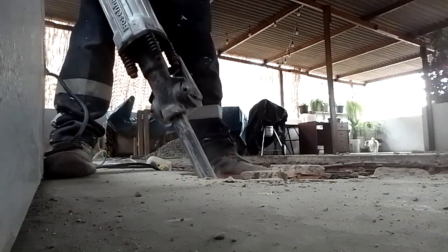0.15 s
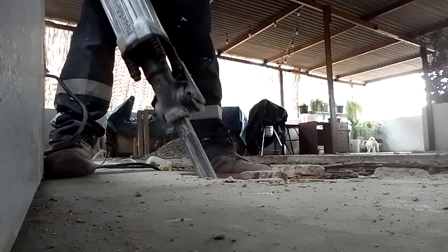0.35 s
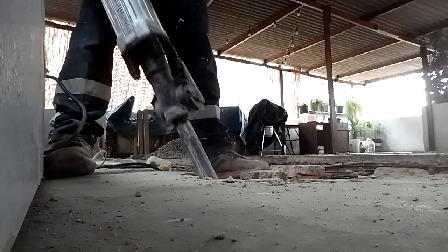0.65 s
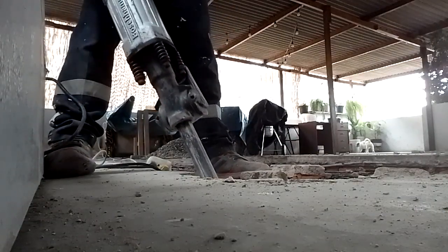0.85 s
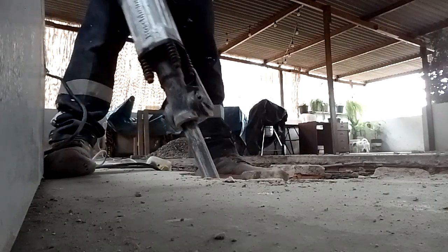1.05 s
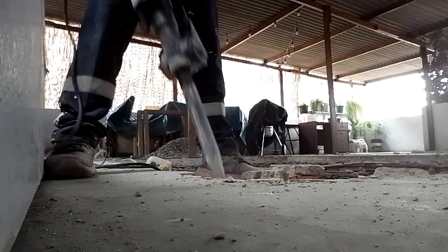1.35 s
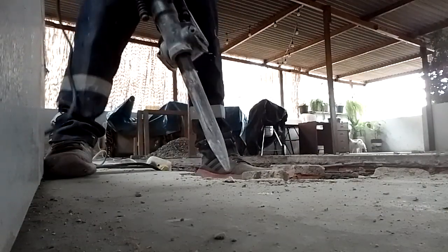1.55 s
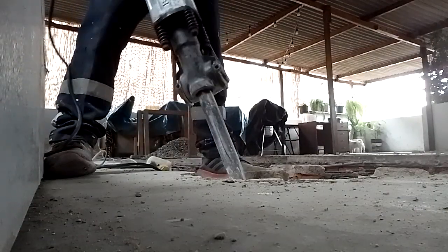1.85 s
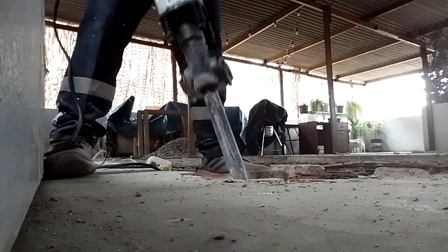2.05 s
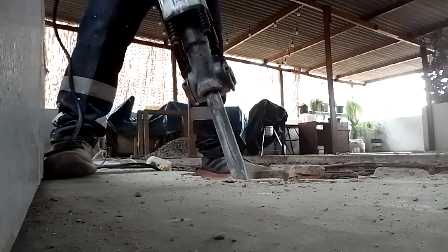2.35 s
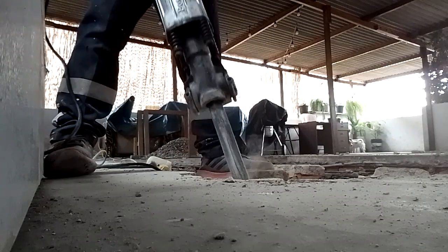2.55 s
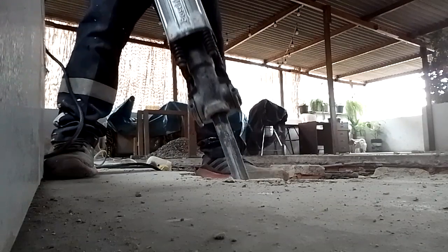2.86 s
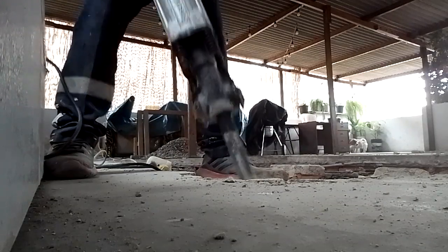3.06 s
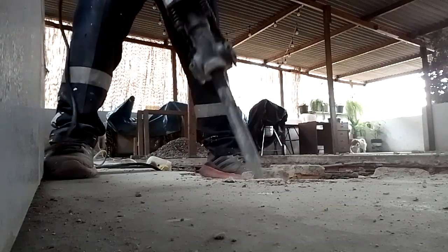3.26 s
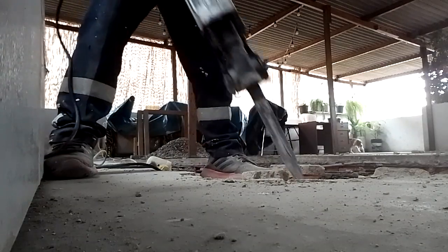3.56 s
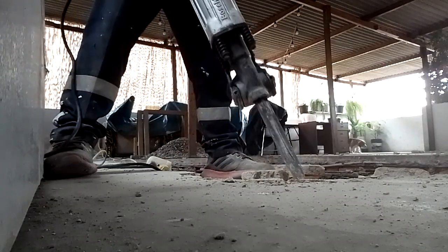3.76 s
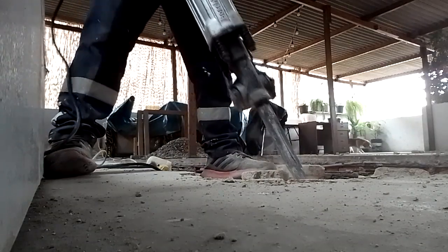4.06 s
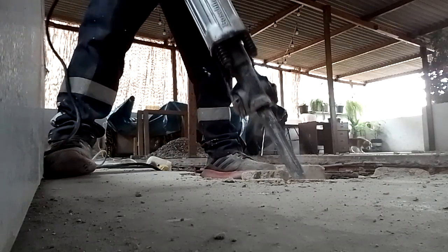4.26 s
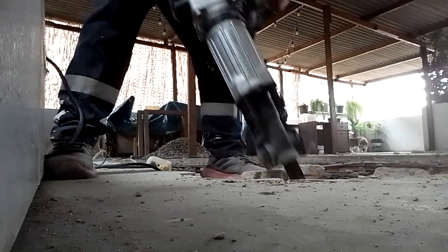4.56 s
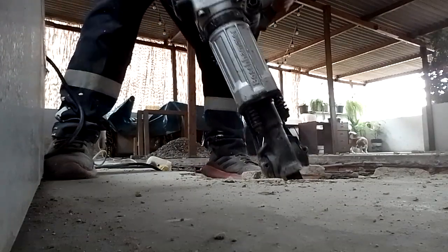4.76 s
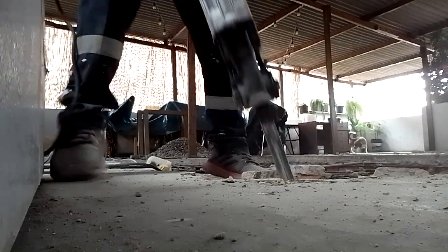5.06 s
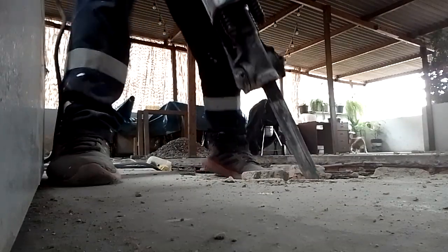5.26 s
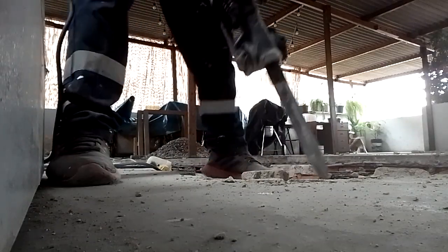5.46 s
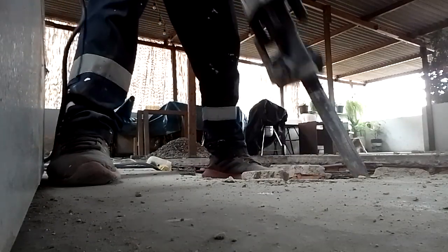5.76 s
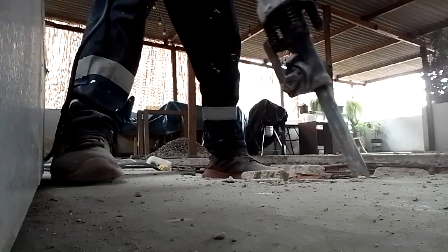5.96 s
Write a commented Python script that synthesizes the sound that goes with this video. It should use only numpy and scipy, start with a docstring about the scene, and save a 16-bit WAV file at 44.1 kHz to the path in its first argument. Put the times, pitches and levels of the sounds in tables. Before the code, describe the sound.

Rapid metallic hammering in uneven spells, under an open roofed area. Each spell is a dense machine-gun clatter of ringing steel, gritty cracks and low thumps, with brief squeaks. Between spells the tool runs free, with rushing fan air, coarse rattle, growling gear case and a rising, piercing whine. The sound is mono, very near, slightly overloaded, with only a slight reverberation.

```python
"""An electric demolition hammer breaks a concrete floor under a sheet roof, close to a mono microphone.
It starts pressed down: its striker hits the chisel some 25 times a second, steel rings, concrete cracks and thuds.
After 1.2 s it is lifted: it rattles nearly idle, the gear case growls and the motor whines upward.
Two more spells follow, from 2 and 3.8 s, each ending in a lift; a third begins at 6 s.
Modes make the ringing, shaped noise most of the rest; loud peaks overload the microphone stage."""
import sys
import numpy as np
from scipy import signal
from scipy.fft import rfft, irfft, next_fast_len
from scipy.io import wavfile
from scipy.ndimage import uniform_filter1d, minimum_filter1d, map_coordinates

SR = 44100
rng = np.random.default_rng(int(sys.argv[2]) if len(sys.argv) > 2 else 0)


def put_to_file(sound):
    """Save the sound as 16-bit audio at rate SR, in the file named by the first command-line argument."""
    columns = np.atleast_2d(sound).T  # one column per channel
    safe = np.clip(columns, -1, 1)
    whole_steps = np.round(safe * 32767)
    wavfile.write(sys.argv[1], SR, whole_steps.astype(np.int16))


N = 270333

# striker blows, levels relative: start_s, crack_db, lengthwise_ring_db, bending_ring_db,
# prying (0-1: how far the blow levers the chisel sideways)
BLOWS = [(0.001, -13, -8, -10, 0.1), (0.044, -9.0, -10, -17, 0.1), (0.092, -12.0, -10, -19, 0.4),
         (0.132, -9, -2, -5, 0.1), (0.189, -7, -14, -10, 0.54), (0.226, -17, -11.5, -23, 0.6),
         (0.267, -10, -1, -1, 0.43), (0.317, -1, -8, -7, 0.36), (0.367, -11, -6, -6.5, 0.6),
         (0.402, -30, -9, -14, 0.4), (0.449, -9, -14, -8, 0.0), (0.494, -15.0, -11, -7.5, 0.16),
         (0.54, -13, -7, -2, 0.0), (0.583, -8, -14, -7, 0.35), (0.625, -14, -12, -11.5, 0.8),
         (0.667, -26, -17, -15, 0.8), (0.712, -12, -15, -8, 0.5), (0.751, -12, -12, -8, 0.6),
         (0.798, -15.0, -8, -3.5, 0.7), (0.84, -13, -9, -10, 0.5), (0.879, -32.0, -25, -21, 0.8),
         (0.929, -7, -9, -16, 0), (0.973, -12.0, -9, -6.5, 0.7), (1.019, -5.5, -18.5, -0.5, 0.88),
         (1.052, -27, -14, -11.5, 0.68), (1.097, -10, -30, -13, 0.77), (1.141, -8, -5, -1, 0.65),
         (1.185, -10, -12, -16, 0.9), (1.222, -23, -15, -16, 0.8), (1.334, -15, -32, -19, 1.0),
         (1.893, -12.5, -28, -27, 0.8), (1.963, -10, -29, -24, 0.8), (2.005, -10, -5, -11, 0.3),
         (2.044, -19, -12, -10, 0.1), (2.082, -18, -2.5, -8, 0), (2.118, -13, -6, -3.5, 0.18),
         (2.155, -8, -6, -5, 0.1), (2.19, -18, 1.5, 1, 0.03), (2.246, -7, -9, -10.5, 0.52),
         (2.31, -10.5, -27, -11, 0.3), (2.351, -18, -5, -2, 0.0), (2.394, -19, -3.5, -5, 0.1),
         (2.433, -8, -1.5, -4, 0), (2.473, -22, -3, -5, 0.1), (2.515, -13, -1.5, -11, 0.3),
         (2.553, -26, -1.5, -20, 0.2), (2.597, -10, -2, -0.5, 0.0), (2.64, -19, -5, -10, 0.4),
         (2.684, -13.0, -6, 0, 0.14), (2.736, -14, -7, -8, 0.47), (2.823, -14, -9, -4.5, 0.71),
         (2.866, -13, -6, -2.5, 0.03), (2.905, -25.0, -11, -12, 0.4), (2.955, -12, -4, 0, 0.0),
         (3.021, -17, -20, -26, 0.9), (3.091, -8.0, -7.5, -0.5, 0.57), (3.143, -17, -15, -1, 0.45),
         (3.189, -8, -14, -4.5, 0.6), (3.25, -18, -31, -18, 0.7), (3.744, -14, -38, -26, 0.7),
         (3.799, -12, -33, -35, 0.8), (3.842, -11, -18, -12, 0.2), (3.884, -9.5, -25, -16, 0.3),
         (3.92, -17, -26, -3, 0.02), (3.959, -18, -12, -5.5, 0.35), (3.99, -15.0, -20, -3, 0.12),
         (4.03, -14, -13, 0.5, 0.04), (4.071, -24, -9.5, -8, 0.16), (4.152, -12, -13, -15, 0.5),
         (4.19, -16, -10, -6, 0.2), (4.235, -6, -14, -10, 0.75), (4.279, -18, -11, -10, 0.3),
         (4.325, -22, -11, -26, 0.5), (4.369, -11.5, -11, -11, 0.62), (4.417, -12, -12, -9.5, 0.59),
         (4.46, -10, -22, -4.5, 0.28), (4.51, -14, -17, -10, 0.56), (4.559, -0.5, -21, -0.5, 0.86),
         (4.604, -4, -30, -7.5, 0.61), (4.65, -12, -35, -16, 0.6), (4.691, -9, -32, -27, 0.8),
         (4.741, -17.0, -34, -23, 0.9), (5.922, -11, -26, -15, 0.7), (5.978, -9, -34, -22, 0.7),
         (6.018, -17, -26, -9.5, 0.5), (6.059, -17, -26, -9, 0.37), (6.095, -23, -32, -10, 0.2)]
# what the tip sits on: start_s, hardness (0-1, crumbled to solid),
# twist (0-1, from the chisel's flat side to its edge)
SEAT = [(0, 0.55, 1), (.14, .7, 0.8), (.28, 0.72, 0.4), (.5, 0.1, 0.25), (.66, 0, 0.84), (.8, 0.04, 0),
        (1.06, 0.1, 0.07), (1.14, .9, 0.26), (1.25, .2, 0.5), (2.05, 0.64, .3), (2.74, 0.87, 0.64),
        (2.823, 0.2, 0), (2.87, 0.74, 0.1), (3.1, 0.91, 0.53), (3.25, 0.3, 0.6), (3.9, 0.74, 0.4),
        (4.46, 0.75, 0), (6.05, 0.8, 0.5)]
# the hammer is pressed on to the floor: start_s, end_s
PRESSED = [(0, 1.21), (1.97, 3.165), (3.84, 4.72), (6.0, 6.2)]
# spectrum of gears, bit and housing rattling: frequency_hz, relative density_db (per Hz)
RATTLE_SPECTRUM = [(30, -32), (110, -33), (200, -17.5), (310, -4.5), (470, 0.5), (730, -3.5), (1080, 1),
                   (1550, -1), (1700, -2), (2300, -1), (2650, -4), (5000, -5.5), (16000, -23)]
# spectrum of the rushing fan air: frequency_hz, relative density_db (per Hz)
AIR_SPECTRUM = [(1200, -21.5), (2600, -4), (3600, 2.5), (4450, -1), (4850, -1), (5400, 5.5), (6400, 2),
                (7000, -2), (7800, 3.5), (8600, -2.5), (9900, -6.5), (10800, -11), (13000, -15.5),
                (15800, -17.5)]
# speeds the whine tends to when the hammer is lifted and when it is pressed down
FREE_HZ, LOADED_HZ = 4020, 3300


def amp(db):
    """Decibels to gain."""
    return 10 ** (np.asarray(db) / 20)


def unit(x):
    """Scale to rms 1."""
    return x / np.sqrt(np.mean(x ** 2) + 1e-20)


def along(points, hz):
    """(Hz, value) points read on a log frequency axis."""
    f, v = np.transpose(points)
    return np.interp(np.log(hz + 1), np.log(f + 1), v)


def curves(rows):
    """One value per sample for each column after the time."""
    s, *cols = np.transpose(rows)
    return [np.interp(np.arange(N) / SR, s, c) for c in cols]


def wobble(rate):
    """A smooth random curve, rate knots a second."""
    knots = rng.standard_normal(int(N * rate / SR) + 4)
    return map_coordinates(knots, [np.arange(N) * rate / SR])


def filtered(x, response):
    """x times a response of frequency."""
    m = next_fast_len(N + 8192)
    return irfft(rfft(x, m) * response(np.fft.rfftfreq(m, 1 / SR)), m)[:N]


def coloured(x, spectrum):
    """x through a spectrum, at rms 1."""
    return unit(filtered(x, lambda hz: amp(along(spectrum, hz))))


def noise(spectrum):
    """Coloured noise of rms 1."""
    return coloured(rng.standard_normal(N), spectrum)


def resonate(x, hz, t60):
    """x through one decaying mode, cut off after a third of a second, at rms 1."""
    t = np.arange(SR // 3) / SR
    mode = amp(-60 * t / t60) * np.sin(2 * np.pi * hz * t)
    return unit(signal.fftconvolve(x, mode)[:N])


def add(track, s, sound):
    """Mix a sound into a track from time s on."""
    start = int(np.clip(round(s * SR), 0, N - 1))
    track[start:start + len(sound)] += sound[:N - start]


def during(start, end):
    """1 between two times, else 0."""
    t = np.arange(N) / SR
    return 1. * ((t >= start) & (t < end))


def lagged(x, lag_s):
    """x followed with a lag."""
    keep = np.exp(-1 / (lag_s * SR))
    return x[0] + signal.lfilter([1 - keep], [1, -keep], x - x[0])


def bursts(levels, t60):
    """An envelope that leaps at every blow and dies away."""
    track, t = np.zeros(N), np.arange(SR // 4) / SR
    for blow, db in zip(BLOWS, levels):
        add(track, blow[0], amp(db - 60 * t / t60))
    return track


def load(lag_s=0.028):
    """Tends to 1 while the hammer is pressed down and to 0 while it runs free."""
    return lagged(sum(during(*span) for span in PRESSED), lag_s)


def speed(run_up_s=.34, sag_s=.27):
    """Pitch of the whine in Hz before flutter: it runs up when lifted and sags under load."""
    t, hz = np.arange(N) / SR, np.full(N, float(LOADED_HZ))
    for press, lift in PRESSED:
        for s, goal, lag in ((press, LOADED_HZ, sag_s), (lift, FREE_HZ, run_up_s)):
            after = t >= s
            hz[after] = goal + (hz[after][:1] - goal) * np.exp((s - t[after]) / lag)
    return hz


def roof(x):
    """The sheet roof and walls answer after 10 ms with a tail of noise, its top treble dying first."""
    # decay of the space: frequency_hz, t60_s
    decay_times = [(200, 0.44), (2000, 0.73), (8000, 1), (15000, 0.087)]
    hz, t, z = signal.stft(rng.standard_normal(SR // 2), SR, nperseg=256)
    fading = amp(-60 * t / along(decay_times, hz)[:, None])
    tail = signal.istft(z * fading, SR, nperseg=256)[1]
    return signal.fftconvolve(np.pad(x, (SR // 100, 0)), tail / np.linalg.norm(tail))[:N]


def fan(stroke, pressed, jolts, air_db=-15.5, load_db=1, hard_db=-2.0):
    """Fan air rushes, swelling with the crank; the rush is a little weaker while the chisel is pressed on a
    hard seat."""
    on_hard_seat = pressed * curves(SEAT)[0]
    level = air_db + load_db * pressed + hard_db * on_hard_seat + jolts
    return amp(level) * unit(amp(0.54 * stroke + 2.65 * wobble(300)) * noise(AIR_SPECTRUM))


def blade_hiss(phase, whine_hz, pressed, blade_db=-21, ratio=1.09, width_hz=350, power=9):
    """A narrow hiss from the fan blades rises and swells with the speed of the lifted hammer."""
    swell = (1 - pressed) * (whine_hz / FREE_HZ) ** power
    return amp(blade_db) * swell * unit(wobble(2 * width_hz) * np.sin(ratio * phase))


def gears(stroke, jolts, rattle_db=2, clatter_db=1.9):
    """Gears and bit rattle: noise that throbs with the crank and clatters unevenly."""
    # rattle before the overall gain: start_s, level_db
    rattle_levels = [(0, -19.5), (.7, -17), (1.3, -18.5), (1.9, -17.5), (2.2, -22.5), (2.9, -20),
                     (3.25, -15.5), (3.7, -19), (4.05, -20), (4.45, -20.5), (4.8, -15), (5.15, -15),
                     (5.35, -16.5), (5.9, -16), (6.13, -25.5)]
    level = rattle_db + curves(rattle_levels)[0] + jolts
    clatter = amp(stroke + clatter_db * wobble(350)) * rng.standard_normal(N)
    return amp(level) * coloured(clatter, RATTLE_SPECTRUM)


def whine(phase, whine_db=1, side_db=-13):
    """The rotor sings a tone and its octave; weaker rotor tones glide along beside them."""
    # whine before the overall gain: start_s, level_db, octave_db
    whine_levels = [(0, -41, -35), (1.25, -28, -27), (1.52, -26, -32), (1.7, -29, -28), (1.9, -26, -32),
                    (2.1, -31, -36), (3.2, -35, -39), (3.45, -17.5, -35), (3.6, -28, -34), (3.71, -17, -34),
                    (3.8, -33, -38), (4.77, -36, -30), (4.84, -22.5, -24), (5.08, -18.5, -26),
                    (5.18, -25, -26), (5.55, -23.5, -23), (5.67, -16.5, -17.5), (6.13, -30, -24.5)]
    main, octave = curves(whine_levels)

    def tone(multiple, db):
        """One rotor tone of wavering strength."""
        return amp(whine_db + db) * unit(amp(2.7 * wobble(90)) * np.sin(multiple * phase))

    neighbours = (.9, 1.11, 1.39)
    return tone(1, main) + tone(2, octave) + sum(tone(k, main + side_db) for k in neighbours)


def motor(gear_ratio=147, throb_db=1.08, second_db=0.4, jolt_db=2.5, drag=.0013, flutter=.0016):
    """The rotor turns the crank through gears: rattle and air throb with the crank, the whine follows the rotor."""
    whine_hz, pressed = speed(), load()
    crank = 2 * np.pi * np.cumsum(whine_hz / gear_ratio) / SR
    # in dB, swelling once per turn of the crank, a little unevenly
    stroke = throb_db * np.cos(crank) + second_db * np.cos(2 * crank + 1)
    # under load the machine jolts about
    jolts = jolt_db * pressed * wobble(35)
    # each compression stroke drags on the rotor, and its speed flutters a little
    uneven = 1 + drag * np.sin(crank) + flutter * wobble(160)
    phase = 2 * np.pi * np.cumsum(whine_hz * uneven) / SR
    air = fan(stroke, pressed, jolts) + blade_hiss(phase, whine_hz, pressed)
    return air + gears(stroke, jolts) + whine(phase)


def gear_case(growl_db=0, tooth_db=3):
    """Uneven knocks of the gear teeth ring the case, which growls when the hammer runs free."""
    # lower and upper resonance of the case: frequency_hz, t60_s
    case_modes = [(1190, 0.0086), (1440, 0.034)]
    # growl before the overall gain: start_s, lower_resonance_db, upper_resonance_db
    growl_levels = [(0, -49, -31), (1.15, -32, -32), (1.35, -18, -25), (1.65, -27, -21.5), (2.0, -29, -29),
                    (3.1, -40, -47), (3.35, -27, -33), (3.62, -19, -24), (3.95, -36, -51), (4.8, -33, -27),
                    (5.2, -21.5, -42), (5.52, -28, -23), (5.85, -21, -36), (6.13, -42, -40)]
    knocks = np.diff(amp(tooth_db * wobble(450)) * rng.standard_normal(N), prepend=0)
    growl = np.zeros(N)
    for (hz, t60), db in zip(case_modes, curves(growl_levels)):
        growl += amp(db + growl_db) * resonate(knocks, hz, t60)
    return growl


def ground(thud_db=3.0, shake_db=9, slab_lag_s=0.016, lumpy_db=4):
    """The blows thump and shake the floor; a loose slab hums in time with them."""
    # floor before the overall gains: start_s, thud_db, ground_shake_db
    floor_levels = [(0, -25.5, -41), (.65, -25.5, -40.5), (1.15, -29, -39.5), (1.65, -54, -55),
                    (1.85, -42, -60), (2.1, -28.5, -45), (2.35, -24, -42), (2.7, -30.5, -42),
                    (3.25, -33, -47), (3.38, -43, -60), (3.65, -45, -54), (3.71, -24.5, -55),
                    (4.25, -23.5, -39), (4.7, -38.5, -48), (5.85, -39, -50), (5.92, -28.5, -54),
                    (6.13, -30, -46)]
    # spectra of the thud and of the deeper shaking: frequency_hz, relative density_db (per Hz)
    thud_spectrum = [(40, -25), (100, -17.5), (135, -8), (165, -2), (280, -0.5), (450, -4.5), (800, -10.5),
                     (2000, -42)]
    shake_spectrum = [(12, -17), (28, 5), (50, -10), (90, -0.5), (200, -27), (600, -60)]
    # a loose slab hums under the chisel: start_s, end_s, level_db
    slab_spans = [(2.05, 2.23, -22), (2.337, 2.687, -21.5)]
    # the slab's one mode: frequency_hz, t60_s
    slab_mode = (432, 0.83)
    thud, shake = curves(floor_levels)
    beat = unit(.5 + bursts(np.zeros(len(BLOWS)), t60=0.078))
    tremor = unit(amp(lumpy_db * wobble(16)) * beat * noise(shake_spectrum))
    loose = lagged(sum(amp(db) * during(start, end) for start, end, db in slab_spans), slab_lag_s)
    hum = loose * resonate(beat * rng.standard_normal(N), *slab_mode)
    return amp(thud + thud_db) * beat * noise(thud_spectrum) + amp(shake + shake_db) * tremor + hum


def squeaks(length_s=0.0062, squeak_db=6, waver=0.017, rough_db=0, rough_s=0.0077):
    """The steel squeaks or the bit rattles: short wavering tones, each in a brief swell of rough noise."""
    # tones before waver and overall gain: middle_s, pitch_hz, level_db
    squeak_list = [(.125, 6800, -22), (.263, 6760, -19), (.572, 6900, -12), (1.092, 4500, -15),
                   (2.468, 4600, -23), (2.507, 4650, -23), (2.59, 4540, -15), (2.678, 4560, -14.5),
                   (2.816, 4450, -17), (2.946, 4420, -16.5), (3.085, 4620, -16), (3.743, 5660, -13),
                   (4.145, 7400, -17), (4.365, 6400, -15), (4.41, 6300, -13), (4.5, 6350, -17),
                   (4.548, 6420, -2), (4.592, 6500, -9), (4.74, 6350, -17), (4.97, 6660, -21),
                   (4.995, 6700, -18), (5.07, 6700, -19)]
    track, t = np.zeros(N), np.arange(SR // 25) / SR
    middle = t.mean()
    shake, rough = wobble(460), noise(RATTLE_SPECTRUM) + noise(AIR_SPECTRUM)
    for s, hz, db in squeak_list:
        now = int(s * SR) + np.arange(len(t))
        turns = np.cumsum(hz * (1 + waver * shake[now])) / SR
        tone = np.exp(-((t - middle) / length_s) ** 2) * np.sin(2 * np.pi * turns)
        swell = np.exp(-((t - middle) / rough_s) ** 2) * rough[now]
        add(track, s - middle, amp(db + squeak_db) * tone)
        add(track, s - middle, amp(db + rough_db) * swell)
    return track


def concrete(snap_db=6, crumble_db=3, grit_db=-1.0, bite=0.72, full_ring_db=-12, knock_db=0, knock_t60=0.047):
    """Each blow cracks the concrete and knocks the housing; gritty crumbling follows, less after a weak ring."""
    # spectrum of breaking concrete: frequency_hz, relative density_db (per Hz)
    crack_spectrum = [(200, -35), (600, 5.5), (1500, -5), (3000, -1), (5500, -0.5), (7800, 12.5), (9600, 3),
                      (11000, 5.5), (13000, 4), (15800, -4.5)]
    cracks = np.array([blow[1] for blow in BLOWS])
    # a ring below full strength means a shallower bite
    shortfall = np.minimum(ringing().max(axis=1) - full_ring_db, 0)
    snap = bursts(cracks + snap_db, t60=0.034) * noise(crack_spectrum)
    knock = bursts(cracks + knock_db, t60=knock_t60) * noise(RATTLE_SPECTRUM)
    crumble = bursts(cracks + crumble_db + bite * shortfall, t60=0.14) * noise(crack_spectrum)
    return snap + knock + crumble * unit(amp(grit_db * wobble(700)))


def ringing():
    """Level in dB of each mode family (columns) per blow (rows); bending families share the bending energy."""
    # bending families from low to high: base_db, full_prying_db, solid_seat_db
    mode_shares = [(-43.5, 52.5, -1.5), (4.5, 10, -31), (13, -10.5, -22), (-6, -7.5, -4.5),
                   (-28.5, -41, 46.5)]
    s, _, lengthwise, bending, prying = np.transpose(BLOWS)
    base, per_prying, per_hardness = np.transpose(mode_shares)
    hardness = np.interp(s, *np.transpose(SEAT)[:2])
    share = amp(base + np.outer(prying, per_prying) + np.outer(hardness, per_hardness))
    share_db = 20 * np.log10(share / np.linalg.norm(share, axis=1, keepdims=True))
    return np.column_stack([bending[:, None] + share_db, lengthwise])


def chisel(ring_db=6.5, rise=0.0048, detune=0.00137, choke_t60=0.017, free_s=0.083, build_s=0.0042,
           chatter_db=2, scatter=0.054, uneven_db=1.77):
    """Each blow rings the steel bar until the next blow, or the concrete, chokes it."""
    # modes before detuning and choking: pitch_hz, relative level_db, t60_s,
    # family (0-4 bending from low to high, 5 lengthwise), full_twist_db (gain at full twist)
    chisel_modes = [(2953, 0, .2, 0, -6), (3140, -12, .17, 0, 12), (5484, 2, .25, 1, -10),
                    (5765, -11, .22, 1, 15), (8426, 0, .22, 2, -8), (8773, -12.5, .18, 2, 12),
                    (11756, -2.5, .22, 3, -8), (12112, -11, .15, 3, 12), (15221, 0, .22, 4, -6),
                    (15528, -10, .2, 4, 10), (14615, -20, .15, 4, 0), (7835, -1.5, .27, 5, 0),
                    (15668, -15, .15, 5, 0)]
    track, t = np.zeros(N), np.arange(SR // 10) / SR
    times = [blow[0] for blow in BLOWS]
    gaps = np.minimum(np.diff(times, append=N / SR + 1), free_s)
    rings, twist = ringing(), curves(SEAT)[1]
    # the pitch creeps up as the tip is pressed back on to the floor
    glide = 1 + rise * np.minimum(t / free_s, 1) ** 5
    for hz, db, t60, family, twist_db in chisel_modes:
        # the bit chatters in its holder, which roughens the size and phase of every mode
        chatter, slip = np.pad([wobble(220), wobble(500)], [(0, 0), (0, len(t))])
        chances = rng.standard_normal((len(BLOWS), 3))
        for s, ring, gap, (size, tune, phase) in zip(times, rings, gaps, chances):
            now = abs(int(s * SR)) + np.arange(len(t))
            decay = amp(-60 * (t / t60 + np.maximum(t - gap, 0) / choke_t60))
            life = (1 - np.exp(-t / build_s)) * decay
            turns = np.cumsum(hz * (1 + detune * tune) * glide) / SR + phase + scatter * slip[now]
            level = ring_db + ring[round(family)] + db + twist_db * twist[now[0]]
            level = level + uneven_db * size + chatter_db * chatter[now]
            add(track, s, life * amp(level) * np.sin(2 * np.pi * turns))
    return track


def scene(roof_db=-19):
    """The hammer at work, alike in both channels; the roof answers the chisel and the concrete."""
    work = squeaks() + concrete() + chisel()
    sound = amp(roof_db) * roof(work) + motor() + gear_case() + ground() + work
    return np.array([sound, sound])


def limiter(x, ceiling=2.15, hold_s=0.006):
    """Pulls the gain down around every peak above the ceiling."""
    size = max(int(hold_s * SR), 3) | 1
    needed = np.minimum(1, ceiling / (np.abs(x).max(axis=0) + 1e-9))
    return x * uniform_filter1d(minimum_filter1d(needed, size), size)


def overload(x, top=.72, hardness=5):
    """The microphone stage rounds off the loudest peaks."""
    # at twice the rate, so that the overtones do not fold back
    fine = signal.resample_poly(x, 2, 1)
    rounded = fine / (1 + np.abs(fine / top) ** hardness) ** (1 / hardness)
    return signal.resample_poly(rounded, 1, 2)


def record(dry, drive_db=1, low_cut_hz=130, low_floor=0.33, top_hz=15830):
    """A limiter, an overloaded input, a bass shelf and the band limit."""
    def response(hz):
        """Gain falls to low_floor in the bass and to nothing from top_hz up."""
        shelf = low_floor + (1 - low_floor) * hz ** 4 / (hz ** 4 + low_cut_hz ** 4)
        return shelf * (hz < top_hz)

    return np.array([filtered(overload(x), response) for x in limiter(dry * amp(drive_db))])


dry = scene()
out = record(dry)
put_to_file(out)
```